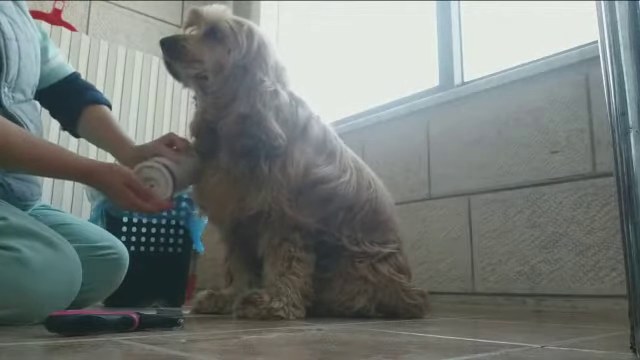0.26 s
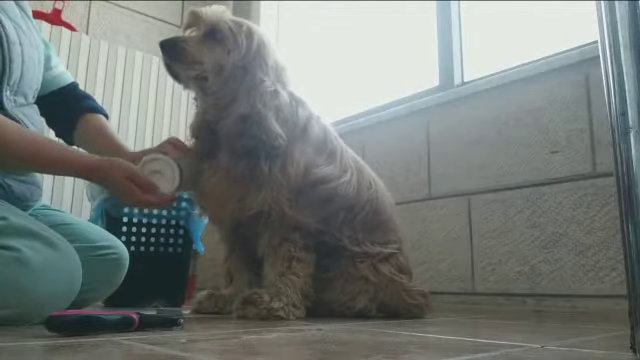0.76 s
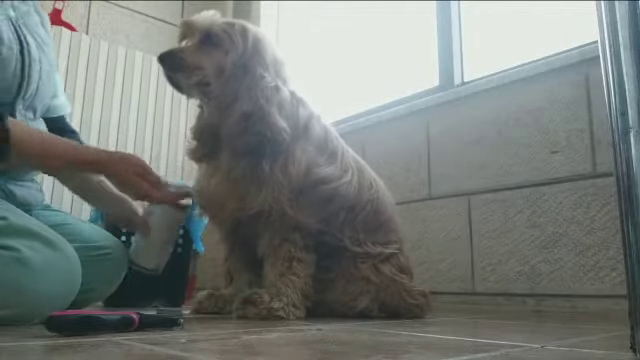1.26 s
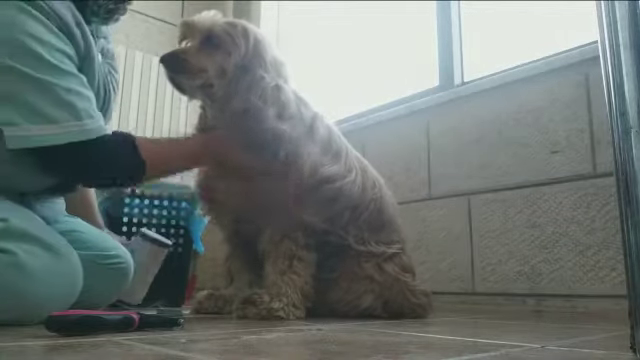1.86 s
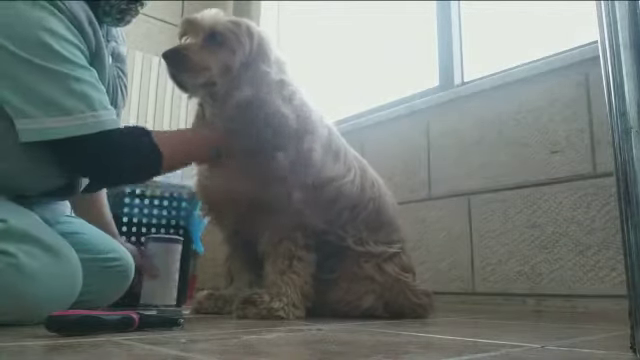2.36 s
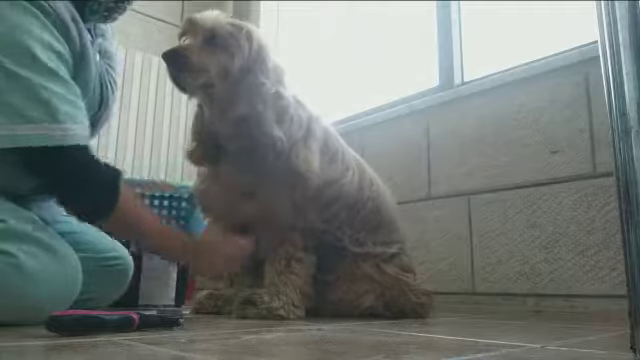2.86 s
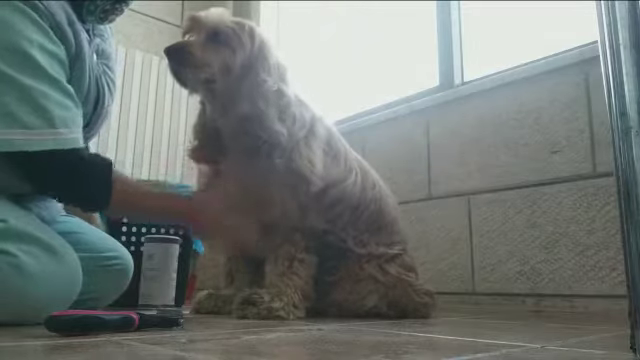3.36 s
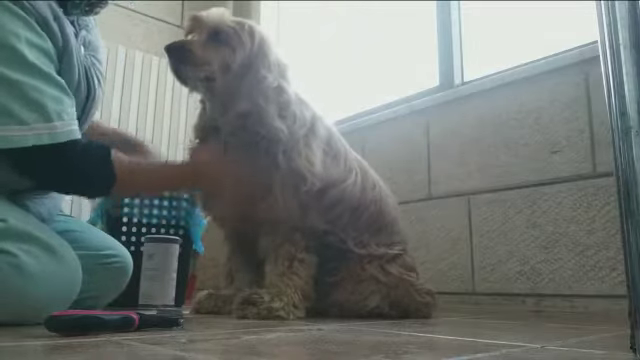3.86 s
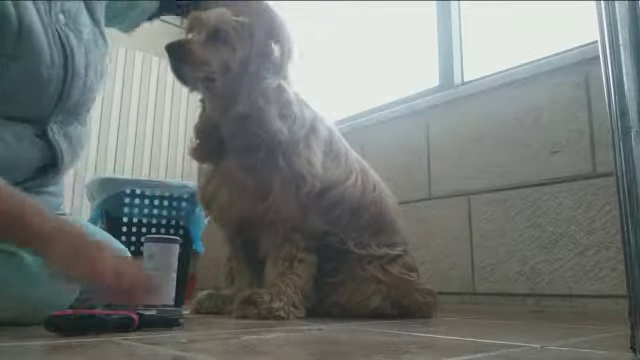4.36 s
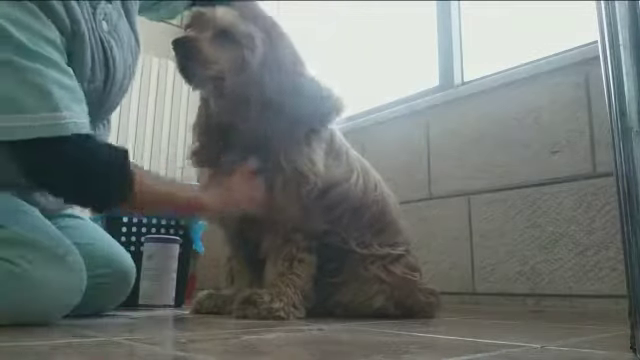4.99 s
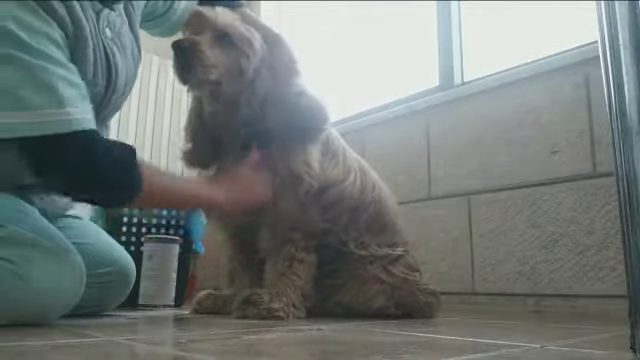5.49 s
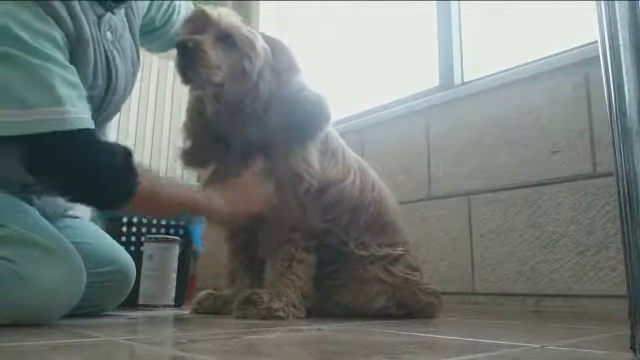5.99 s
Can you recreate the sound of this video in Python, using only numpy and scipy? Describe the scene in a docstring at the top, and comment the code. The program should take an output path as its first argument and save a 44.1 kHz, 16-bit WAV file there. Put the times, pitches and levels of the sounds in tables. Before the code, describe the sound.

A canister knocks loudly onto a tiled floor, scrapes and is stood up, then a brush clacks and rakes three times through long fur.

```python
"""A low wavering rumble under faint hiss comes first, with light swishes of fur and soft thuds on the floor of
a small tiled room where a kneeling person grooms a long-haired dog. A canister is set down on the floor, slides
and rocks: blows ring its modes, stick-slip grains make it rumble and rasp. Clothes rustle as shaped friction
grains. A slicker brush is then picked up with clacks and raked through the coat three times: hair friction
hisses and the wire pins ring as resonators on their pad."""
import sys
import numpy as np
from scipy import signal
from scipy.fft import rfft, irfft, next_fast_len
from scipy.io import wavfile
from scipy.ndimage import uniform_filter1d

SR = 44100
rng = np.random.default_rng(int(sys.argv[2]) if len(sys.argv) > 2 else 0)


def store_pcm(level_fs):
    """Save levels as 16-bit WAV."""
    pcm = np.round(np.clip(level_fs, -1, 1) * 32767).astype(np.int16)
    wavfile.write(sys.argv[1], SR, np.atleast_2d(pcm).T)


N = 274743
TIME = np.arange(N) / SR

# low room rumble, spectrum: frequency_hz, level_db
RUMBLE_SPECTRUM = [(25, -37), (45, -10.5), (62, -16.5), (85, -4), (105, 1.5), (140, 2), (180, -8),
                   (240, -12.5), (320, -11), (420, -25.5), (700, -56)]
# steady level, extra at the start, and time constant in which the extra settles
RUMBLE_DB, RUMBLE_EXTRA_DB, RUMBLE_SETTLE_S = -69, 5.5, 1.75
# even room hiss, spectrum: frequency_hz, level_db
AIR_SPECTRUM = [(150, -4), (300, 3.5), (420, 2.5), (560, 0), (900, 3.5), (1250, 1.5), (1850, 0), (2300, -9),
                (3400, -12), (6000, -15.5), (8400, -19), (11000, -23.5), (15500, -12.5)]
# hiss of each port, spectrum: frequency_hz, level_db
PORT_HISS_SPECTRUM = [(100, -2.5), (500, -1), (3000, -1.5), (6000, -0.5), (10000, 3), (15000, -1)]
# bands in which the two ports differ: centre_hz, width_hz, share_leaning_left (ratio)
PORT_LEAN_BANDS = [(1860, 500, -0.43), (9700, 500, 0.49)]
CUTOFF_HZ = 15550

# room decay: frequency_hz, t60_s
ROOM_DECAY = [(100, 0.97), (260, 0.44), (700, 0.38), (1840, 0.26), (4850, 0.3), (12800, 0.32)]
# wall echoes: delay_s, gain (ratio)
WALL_ECHOES = [(.0021, 0.3), (.0095, 0.43), (0.0151, .45)]

# light touches on the coat, and at 4.455 s a faint high hiss of the brush's pins just before it is picked up:
# peak_s, level_db, rise_s, low_cut_hz
COAT_TOUCHES = [(0.01, -71, 0.038, 3260), (0.215, -71, 0.026, 2700), (0.415, -73, 0.022, 6000),
                (0.593, -70.5, 0.049, 1250), (0.765, -71.5, 0.027, 4120), (1.215, -68, 0.047, 3240),
                (2.68, -76, 0.34, 2850), (3.11, -71, 0.047, 1170), (3.23, -71, 0.035, 3100),
                (3.655, -69.5, 0.042, 2970), (3.835, -73.5, 0.034, 980), (4.03, -75, 0.036, 4930),
                (4.455, -73, 0.037, 11000), (5.783, -69.5, 0.032, 4070)]
TOUCH_FADE_RATIO = 0.93  # fade as a multiple of the rise
# fur under the hand, spectrum: frequency_hz, level_db
COAT_SPECTRUM = [(900, 11.5), (1900, 11.5), (2600, 0.5), (3700, 3), (5500, -4.5), (7000, -2.5), (8500, 3.5),
                 (10000, -6), (12000, -3.5), (15500, -12)]
# soft thuds of paws and knees shifting: peak_s, level_db, rise_s, fade_s
BODY_SHIFTS = [(0.23, -66.5, 0.065, 0.039), (0.601, -62, 0.033, 0.027), (1.13, -88, 0.045, 0.023)]
SCUFF_S = 3.10  # hollow scuff of the hand on the coat

# canister blows: start_s, peak_db, contact_brightness_hz, rim_crack_peak_db
CANISTER_KNOCKS = [(0.579, -52, 2640, -69), (1.7040, -21.5, 2000, -25), (1.7183, -16, 605, -36.5),
                   (1.7360, -29, 560, -61), (1.959, -44, 1200, -72), (2.163, -41.5, 249, -47),
                   (2.1935, -39, 1480, -38.5), (2.253, -56, 223, -66), (2.357, -48, 2800, -51.5),
                   (2.3932, -28.5, 2180, -35.5), (2.408, -31.5, 745, -55), (2.488, -49.5, 700, -71)]
# modes of the canister on the floor: frequency_hz, width_hz, level_db
CANISTER_MODES = [(76.4, 40, 5), (121.4, 20, 10), (185.5, 47, 5), (221.2, 24, 7.5), (234.7, 34.6, 8),
                  (350.5, 2.8, 4), (457, 5.9, 0.5), (504, 55, 2), (592, 42, 1), (689, 74, 6), (783, 124, 5),
                  (920, 29, 3), (979.6, 15.5, 7), (1460, 260, -12), (1692, 69, -2.5), (2084, 94, -3),
                  (2554, 58, -9), (2680, 150, -15), (3940, 630, -24), (7000, 3700, -19),
                  (12400, 1900, -15.5)]
# modes of its hard rim: frequency_hz, width_hz, level_db
RIM_MODES = [(2425, 380, 5), (3980, 500, -1), (6280, 4300, -12), (8760, 690, -8), (11400, 2400, -15.5)]
# a brighter contact also gives less bass: low cut as a share of contact brightness
KNOCK_LOW_SHARE = 0.96
# top of the crack on light and hard blows
CRACK_LIGHT_HZ, CRACK_HARD_HZ = 3160, 14800
# peak from which a blow is hard; force lost below it, in dB per dB
HARD_BLOW_DB, CRACK_STEEPNESS = -23, 3.3
THUD_S = 1.7185  # the floor answers deeply under the canister

# arm movements in sleeves and trousers: start_s, end_s, cloth_rub_db, sleeve_rasp_db, rise_s, fade_s
ARM_MOVES = [(1.438, 1.513, -58, -70, 0.1, 0.055), (1.675, 1.7, -68.5, -71, 0.031, 0.055),
             (4.24, 4.34, -68.5, -70.5, 0.23, 0.37)]
# rubbing cloth, spectrum: frequency_hz, level_db
CLOTH_SPECTRUM = [(450, -16), (650, -11), (850, -4.5), (1300, -7.5), (2100, -5), (2900, -9), (5500, -12.5),
                  (8500, -12.5), (11000, -18), (15500, -23)]
# the sleeve rasps only near the height of a movement: share of the rise and fade
SLEEVE_SHARE = 0.47

# pushes of the canister over the tiles: start_s, end_s, rumble_db, grit_db
CANISTER_PUSHES = [(1.87, 1.908, -46.5, -63), (1.98, 2.125, -43, -59.5), (2.198, 2.235, -36, -49),
                   (2.29, 2.402, -43.5, -78)]
PUSH_RISE_S, RUMBLE_FADE_S, GRIT_FADE_S = 0.045, 0.021, 0.017
# grit under the rim, spectrum: frequency_hz, level_db
GRIT_SPECTRUM = [(400, -16), (750, 17), (1000, 4.5), (1250, -30), (1600, 3), (2100, 1.5), (2950, 1.5),
                 (3500, -9.5), (6000, -9), (9000, -13.5), (12000, -16), (15500, -26)]

# brush gripped and lifted off the tiles: start_s, pin_clack_peak_db, handle_bump_peak_db
BRUSH_JOLTS = [(4.4734, -46.5, -44), (4.499, -47, -43.5), (4.544, -38, -52), (4.5567, -37, -39.5),
               (4.566, -40, -62)]
# modes of the pad and wire pins: frequency_hz, width_hz, level_db
PIN_MODES = [(1223, 84, 3.5), (1693, 81, 4.5), (1894, 65, 10.5), (2052, 126, 5), (3170, 46, -23),
             (3390, 70, -6.5), (5100, 1200, -10.5), (6460, 120, 3), (6980, 130, -3.5), (6800, 420, -14),
             (8130, 1900, -9), (8930, 270, -1.5), (9840, 390, -5), (11500, 120, -3), (11860, 600, -3),
             (12080, 250, 8.5), (12500, 1200, -11)]
# modes of the handle: frequency_hz, width_hz, level_db
HANDLE_MODES = [(254, 50, 9), (360, 34, 5), (467, 34, 1), (720, 104, 4), (1180, 22, 11.5), (1818, 3.9, 9),
                (2900, 63, 1.5), (5080, 240, 3.5)]
FLICK_S = 4.6352  # thin high tick as the brush comes up

# brush strokes, from pins landing to a snag letting go:
# landing_s, release_s, hair_hiss_db, pin_twang_db, snag_peak_db, landing_rasp_db, rasp_hz
BRUSH_STROKES = [(5.048, 5.196, -62.5, -60.5, -46, -65, 4500),
                 (5.56, 5.6583, -62.5, -55.5, -43.5, -66.5, 5250),
                 (6.028, 6.159, -61.5, -62.5, -60, -66.5, 5440)]
# hair between the pins, spectrum: frequency_hz, level_db
HAIR_SPECTRUM = [(1200, -12), (3000, -7), (4200, -6.5), (5200, -12), (7000, 2.5), (9000, -2), (11000, 0.5),
                 (13500, -1.5), (15500, -18)]
STROKE_RISE_S, HISS_FADE_S, TWANG_FADE_S = 0.024, 0.016, 0.042
# share of a stroke in which the pins sink to full depth; level changes at the surface
SINK_SHARE, SHALLOW_HISS_DB, SHALLOW_TWANG_DB = 0.58, -10.5, -15
# landing bite: extra hiss relative to the stroke's hiss, fade, and width of each rasp resonance
BITE_HISS_DB, BITE_FADE_S, BITE_WIDTH_HZ = 1, 0.031, 2400


def from_db(db):
    """Logarithmic level: decibels to amplitude gain."""
    return 10 ** (np.asarray(db) / 20)


def rms_one(x):
    """Normalisation: scale to an rms of 1."""
    return x / np.sqrt(np.mean(x ** 2) + 1e-20)


def evened(x, window_s):
    """Level control: hold the short-term rms near 1, keeping the finer grain."""
    power = uniform_filter1d(x * x, max(int(window_s * SR), 2))
    return x / np.sqrt(np.abs(power) + 1e-12)


def at_hz(points, hz):
    """Interpolation: read a table on a log-frequency axis."""
    table = np.array(points)
    return np.interp(np.log(np.maximum(hz, 1)), np.log(table[:, 0]), table[:, 1])


def coloured(x, spectrum):
    """Spectral shaping: multiply the spectrum by a smooth gain curve."""
    size = next_fast_len(N + SR // 10)
    hz = np.arange(size // 2 + 1) * SR / size
    return irfft(rfft(x, size) * from_db(at_hz(spectrum, hz)), size)[..., :N]


def cut(x, hz, kind, order=2):
    """Butterworth filtering: maximally flat low- or high-pass."""
    sections = signal.butter(order, np.clip(hz, 10, .45 * SR), kind, fs=SR, output="sos")
    return signal.sosfilt(sections, x + 1e-18)


def resonate(x, hz, width_hz):
    """Resonance: one damped mode with gain near 1 at its peak."""
    r = np.exp(-np.pi * width_hz / SR)
    zeros = np.array([1, 0, -1]) * (1 - r * r) / 2
    poles = [1, -2 * r * np.cos(2 * np.pi * hz / SR), r * r]
    return signal.lfilter(zeros, poles, x + 1e-18)


def ring_of(modes):
    """Modal superposition: half a second of impulse response, successive modes in opposite senses."""
    click = signal.unit_impulse(SR // 2)
    return sum((-1) ** k * from_db(db) * resonate(click, hz, width_hz)
               for k, (hz, width_hz, db) in enumerate(modes))


def through(x, response):
    """Linear convolution: send a signal through a body or a room."""
    return signal.fftconvolve(x, response)[:N]


def add(out, s, peak_db, sound):
    """Superposition: place a short sound at its time with its peak level."""
    at = int(np.clip(round(s * SR), 0, N - 1))
    out[at:at + len(sound)] += (from_db(peak_db) * sound / np.abs(sound).max())[:N - at]


def grains(per_s, spread_db):
    """Stick-slip friction: sparse random slips of uneven size and either sign."""
    sizes = from_db(spread_db * np.minimum(rng.exponential(1, N), 4)) * rng.choice([-1, 1], N)
    return sizes * (rng.random(N) < per_s / SR)


def rattle(fade_s, share):
    """Impact excitation: one click with a decaying noise burst of micro-contacts."""
    t = TIME[:SR // 40]
    burst = rng.standard_normal(len(t)) * np.exp(-t / fade_s)
    return signal.unit_impulse(len(t)) + share * cut(burst / np.linalg.norm(burst), 1390, "high")


def held(start_s, end_s, rise_s, fade_s):
    """Contact envelope: Gaussian rise to the start, hold to the end, exponential decay."""
    before = np.minimum(TIME - start_s, 0) / rise_s
    after = np.maximum(TIME - end_s, 0) / fade_s
    return np.exp(-before ** 2 - np.minimum(after, 20))


def swell(s, rise_s, fade_s):
    """Contact envelope without a hold: rise to time s, then decay."""
    return held(s, s, rise_s, fade_s)


def flutter(depth_db, rate_hz):
    """Amplitude modulation: low-passed noise, of rms depth_db, varies the gain."""
    return from_db(depth_db * rms_one(cut(rng.standard_normal(N), rate_hz, "low")))


def room(x, wet_db, build_s=0.011):
    """Reverberation: direct sound, echoes and a diffuse tail longest in the bass, at unit response energy."""
    t = TIME[:SR * 3 // 4]
    white, hz = rfft(rng.standard_normal(len(t))), np.fft.rfftfreq(len(t), 1 / SR)
    edges = np.geomspace(20, SR / 2, 11)
    tail = np.zeros(len(t))
    for low_hz, high_hz in zip(edges, edges[1:]):
        band = irfft(white * (hz >= low_hz) * (hz < high_hz), len(t))
        t60_s = at_hz(ROOM_DECAY, np.sqrt(low_hz * high_hz))
        tail += band * np.exp(-np.log(1000) * t / t60_s)
    tail *= 1 - np.exp(-(t / build_s) ** 2)
    response = from_db(wet_db) * tail / np.linalg.norm(tail)
    response[0] += 1
    for s, gain in WALL_ECHOES:
        response[max(round(s * SR), 1)] += gain
    return through(x, response / np.linalg.norm(response))


def background():
    """Filtered noise: a fluttering low rumble, a little stronger at first, under a faint even hiss."""
    rumble = evened(coloured(rng.standard_normal(N), RUMBLE_SPECTRUM), window_s=0.099)
    air = rms_one(cut(coloured(rng.standard_normal(N), AIR_SPECTRUM), 250, "high", order=4))
    level = from_db(RUMBLE_DB + RUMBLE_EXTRA_DB * np.exp(-TIME / RUMBLE_SETTLE_S))
    return level * rumble * flutter(depth_db=1.1, rate_hz=12) + from_db(-73.0) * air


def touches():
    """Light friction and damped resonance: faint fur swishes, one hollow scuff and soft thuds."""
    fur = coloured(grains(per_s=5700, spread_db=-0.5), COAT_SPECTRUM)
    swishes = np.zeros(N)
    for s, db, rise_s, low_hz in COAT_TOUCHES:
        swish = rms_one(cut(fur, low_hz, "high"))
        swishes += from_db(db) * swell(s, rise_s, TOUCH_FADE_RATIO * rise_s) * swish
    hollow = resonate(resonate(rng.standard_normal(N), hz=775, width_hz=120), hz=820, width_hz=240)
    scuff = from_db(-65.5) * swell(SCUFF_S, rise_s=.04, fade_s=.045) * evened(hollow, window_s=0.045)
    dull = evened(cut(resonate(rng.standard_normal(N), hz=237, width_hz=44), 300, "low"), window_s=0.03)
    thuds = dull * sum(from_db(db) * swell(s, rise_s, fade_s) for s, db, rise_s, fade_s in BODY_SHIFTS)
    return room(swishes + scuff + thuds, wet_db=-6.5)


def canister_blows():
    """Impact on a modal body: each blow rings the body and cracks on its rim; a floor thud joins one."""
    ring = cut(ring_of(CANISTER_MODES), 71, "high", order=4)
    rim, out = ring_of(RIM_MODES), np.zeros(N)
    for s, peak_db, bright_hz, crack_db in CANISTER_KNOCKS:
        blow = cut(through(rattle(fade_s=0.0017, share=1.0), ring), bright_hz, "low")
        add(out, s, peak_db, cut(blow, KNOCK_LOW_SHARE * bright_hz, "high", order=1))
        # a harder blow extends the crack into the treble
        force = from_db(CRACK_STEEPNESS * min(peak_db - HARD_BLOW_DB, 0))
        top_hz = CRACK_LIGHT_HZ + force * (CRACK_HARD_HZ - CRACK_LIGHT_HZ)
        crack = through(rattle(fade_s=0.0038, share=3.7), rim)
        add(out, s, crack_db, cut(crack, top_hz, "low", order=5))
    thud = resonate(ring_of([(75.6, 18, 0)]), hz=72, width_hz=47)
    add(out, THUD_S, peak_db=-47.0, sound=thud)
    return room(out, wet_db=0.5)


def clothes():
    """Textile friction: threads catch on each other as arms move; a sleeve adds a narrower rasp."""
    threads = grains(per_s=7600, spread_db=1.5)
    rub = rms_one(coloured(threads, CLOTH_SPECTRUM))
    rasp = rms_one(resonate(resonate(threads, hz=1850, width_hz=650), hz=1830, width_hz=760))
    out = np.zeros(N)
    for start_s, end_s, rub_db, rasp_db, rise_s, fade_s in ARM_MOVES:
        out += from_db(rub_db) * rub * held(start_s, end_s, rise_s, fade_s)
        sleeve = held(start_s, end_s, SLEEVE_SHARE * rise_s, SLEEVE_SHARE * fade_s)
        out += from_db(rasp_db) * rasp * sleeve
    return room(out, wet_db=-2.5)


def canister_drag():
    """Stick-slip drive: blunt slips sustain the body modes; rim grit brightens with harder pushing."""
    slide, push = np.zeros(N), np.zeros(N)
    for start_s, end_s, rumble_db, grit_db in CANISTER_PUSHES:
        slide += from_db(rumble_db) * held(start_s, end_s, PUSH_RISE_S, RUMBLE_FADE_S)
        push += from_db(grit_db) * held(start_s, end_s, PUSH_RISE_S, GRIT_FADE_S)
    slips = resonate(grains(per_s=420, spread_db=2.5), hz=224.7, width_hz=64)
    slips = cut(slips, 150, "high", order=4)
    rumble = evened(through(slips, ring_of(CANISTER_MODES)), window_s=0.071) * slide
    grit = evened(coloured(grains(per_s=1800, spread_db=0.5), GRIT_SPECTRUM), window_s=0.056)
    dull_grit = coloured(grit, [(2300, -0.5), (4500, -47)])
    hardness = (push / push.max()) ** 0.73
    rasp = (hardness * grit + (1 - hardness) * dull_grit) * push
    return room(rumble + rasp, wet_db=-2.5)


def brush_knocks():
    """Impulsive excitation: jolts and snags ring the pin bed, bumps ring the handle, one high tick pings."""
    pins, handle = ring_of(PIN_MODES), ring_of(HANDLE_MODES)
    out, flick = np.zeros(N), np.zeros(N)
    clacks = [(s, clack_db) for s, clack_db, _ in BRUSH_JOLTS]
    snags = [(release_s, snag_db) for _, release_s, _, _, snag_db, _, _ in BRUSH_STROKES]
    for s, peak_db in clacks + snags:
        add(out, s, peak_db, through(rattle(fade_s=0.0071, share=9.5), pins))
    for s, _, bump_db in BRUSH_JOLTS:
        add(out, s, bump_db, handle)
    ping = resonate(rattle(fade_s=0.017, share=3.0), hz=14500, width_hz=6200)
    add(flick, FLICK_S, peak_db=-41.5, sound=ping)
    return room(out, wet_db=-1.0) + room(flick, wet_db=18.0, build_s=0.0049)


def brush():
    """Friction and elastic release: hairs hiss between the pins, which bend and spring free deeper in the coat."""
    friction = grains(per_s=5500, spread_db=2.5)
    hiss = evened(coloured(friction, HAIR_SPECTRUM), window_s=0.048)
    twang = evened(through(grains(per_s=840, spread_db=5.0), ring_of(PIN_MODES)), window_s=0.064)
    raking = np.zeros(N)
    for land_s, release_s, hiss_db, twang_db, _, bite_db, bite_hz in BRUSH_STROKES:
        # 1 at the surface, 0 at full depth
        shallow = 1 - np.clip((TIME - land_s) / (SINK_SHARE * (release_s - land_s)), 0, 1) ** 2
        hiss_gain = from_db(hiss_db + SHALLOW_HISS_DB * shallow)
        raking += hiss * hiss_gain * held(land_s, release_s, STROKE_RISE_S, HISS_FADE_S)
        twang_gain = from_db(twang_db + SHALLOW_TWANG_DB * shallow)
        raking += twang * twang_gain * held(land_s, release_s, STROKE_RISE_S, TWANG_FADE_S)
        # the landing pins bite with a brief rasp and extra hiss
        rasp = rms_one(resonate(resonate(friction, bite_hz, BITE_WIDTH_HZ), bite_hz, BITE_WIDTH_HZ))
        bite = from_db(bite_db) * rasp + from_db(hiss_db + BITE_HISS_DB) * hiss
        raking += bite * swell(land_s, STROKE_RISE_S, BITE_FADE_S)
    return room(raking, wet_db=-15.0)


def scene():
    """Two-port reception: one mix, stronger right near 2 kHz and left near 10 kHz, plus independent hiss."""
    mix = canister_blows() + canister_drag() + brush() + brush_knocks() + clothes() + touches() + background()
    side = sum(share * resonate(resonate(mix, hz, width_hz), hz, width_hz)
               for hz, width_hz, share in PORT_LEAN_BANDS)
    hiss = from_db(-80.0) * rms_one(coloured(rng.standard_normal((2, N)), PORT_HISS_SPECTRUM))
    return np.array([mix + side, mix - side]) + hiss


def record(dry):
    """Band limitation: a steep elliptic low-pass removes the top."""
    return signal.sosfilt(signal.ellip(12, .1, 70, CUTOFF_HZ, fs=SR, output="sos"), dry)


dry = scene()
out = record(dry)
store_pcm(out)
```